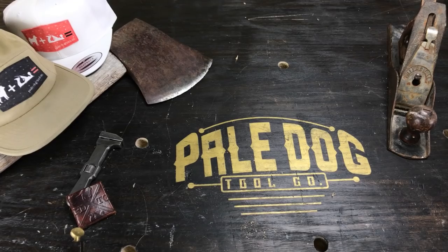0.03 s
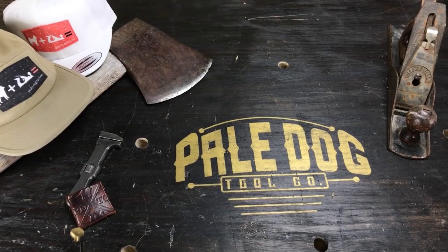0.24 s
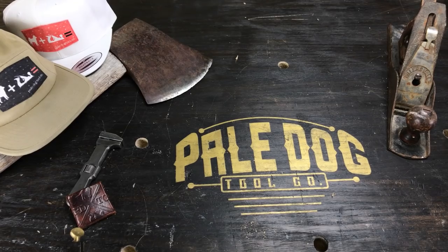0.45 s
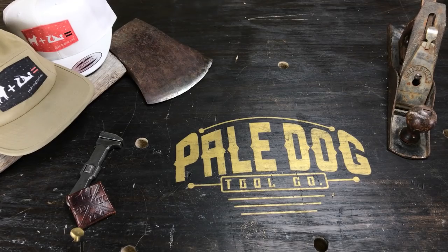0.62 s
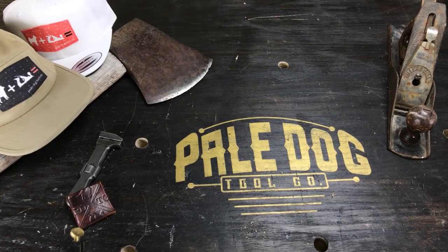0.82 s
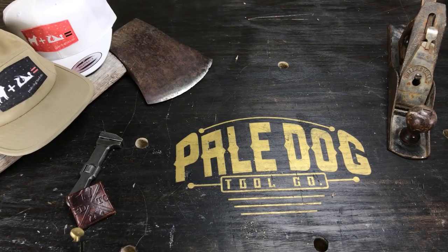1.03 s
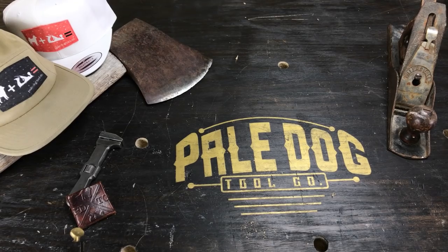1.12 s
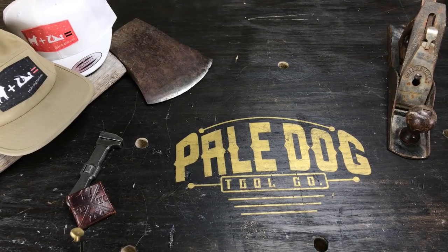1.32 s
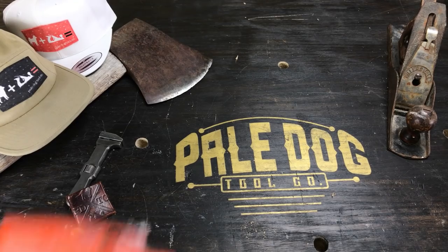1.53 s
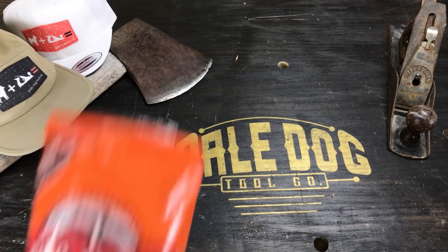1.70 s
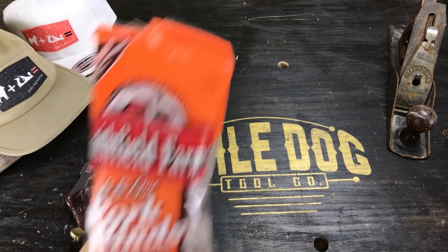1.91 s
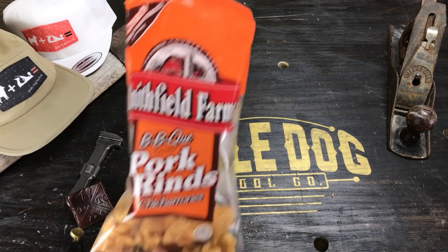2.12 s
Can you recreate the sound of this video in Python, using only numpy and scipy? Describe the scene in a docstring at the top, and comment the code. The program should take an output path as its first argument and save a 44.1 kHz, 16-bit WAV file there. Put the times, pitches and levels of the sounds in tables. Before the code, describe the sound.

A plastic snack bag crinkles close by, slightly left, in a small quiet room. Faint air and hum until 0.2 s, then dense bright crackles with brief hollow hoots and dull air thumps, strongest around 0.7-1.0 s. Snaps thin from 1.1 s and nearly stop by 1.55 s. From 1.85 s a much softer, darker rustle with low bumps sits further left, fading after 2.05 s.

```python
"""Plastic snack bag grabbed and turned

A plastic snack bag close by, a little to the left: each crease snaps as two resonant noise bursts, a bright
crack and a duller film ring, over dense crackle, rubbing noise and the lumpy noise boom of the air inside.
Noise fizz, narrow-band hoots and decaying sine thumps join in; a softer, darker rustle follows further left.
A small room answers with decaying noise; still air (noise) and a faint hum (sines) lie under all."""
import sys
import numpy as np
from scipy import signal
from scipy.fft import rfft, irfft, next_fast_len
from scipy.io import wavfile
from scipy.ndimage import map_coordinates

SR = 44100
rng = np.random.default_rng(int(sys.argv[2]) if len(sys.argv) > 2 else 0)


def dump(signal):
    """Clip the signal to [-1, 1] and save it as 16-bit WAV at the path in sys.argv[1]."""
    limited = np.clip(np.atleast_2d(signal).T, -1, 1)
    pcm = np.round(limited * 32767).astype(np.int16)
    wavfile.write(sys.argv[1], SR, pcm)


N = 94815

# handling of the bag, interpolated in time, before film colour:
# time_s, crackle_level_db, treble_over_level_db, boom_over_level_db, left_over_right_db
HANDLING = [(0.163, -77, 1, -8, -2), (0.169, -51.5, 1, -3, 3.5), (0.213, -56.5, 3.5, -5, 3),
            (0.224, -32, -9, -3, 4), (0.309, -29, 5, -16.5, 2), (0.328, -21.5, -1, -27, 2.5),
            (0.36, -31, 5, -11, 0.5), (0.41, -27.5, 3, -13.5, 1), (0.549, -32.5, 4.5, -15.5, 0),
            (0.56, -24.5, -5, -22, 1), (0.58, -28, 4, -6, 1), (0.6, -25.5, 3.5, -26, 1.5),
            (0.65, -24.5, -4.5, -8, -0.5), (0.68, -29.5, 6.5, -9, 4), (0.69, -28.5, 2, -15.5, 0.5),
            (0.81, -27, -0.5, -11.5, 0.5), (0.83, -34, 16, -8, 0), (0.84, -25.5, -2.5, -17, -2),
            (0.945, -29, -3, -12.5, -1), (1.05, -28, -1, -8.5, 0), (1.13, -35.5, 0, -17.5, -0.5),
            (1.21, -34, -3, -9, 2.5), (1.3, -36, -5, -16.5, 0), (1.36, -44, -5, -6.5, 5),
            (1.385, -35, -2, -12, -1), (1.43, -39.5, -3.5, -10.5, 2.5), (1.513, -38.5, -7.5, -17, 0),
            (1.521, -47.5, 5, -8, 1), (1.66, -55.5, 0.5, -1, 0), (1.84, -55, -12, -4.5, 4.0),
            (1.867, -40, -12, -4.5, 7), (1.94, -48, -3, 0, 3), (2.05, -48, -21, -5, 9),
            (2.065, -55, -9, -9, 5), (2.15, -54.5, -15, -6.5, 6)]
START_S = HANDLING[0][0]
LATE_S = 1.5  # start of the softer rustle


def amp(db):
    """dB to gain."""
    return 10 ** (np.asarray(db) / 20)


def unit(x):
    """Scale to rms 1."""
    return x / np.sqrt(np.mean(x ** 2) + 1e-20)


def along(points, hz):
    """Interpolate (Hz, value) points on a log frequency axis."""
    point_hz, value = np.transpose(points)
    return np.interp(np.log(hz + 1), np.log(point_hz + 1), value)


def sides(pan_db):
    """Left and right gains from left over right in dB."""
    return amp(np.array([pan_db, -pan_db]) / 2)


def filtered(x, response):
    """Multiply the spectrum of x by a response of frequency, zero-padded by at least half a second."""
    size = next_fast_len(N + SR // 2)
    spectrum = rfft(x, size) * response(np.fft.rfftfreq(size, 1 / SR))
    return irfft(spectrum, size)[..., :N]


def pair(x, gain, alike):
    """Mix two unrelated signals as mid and side into left and right of a given likeness per frequency."""
    def mid_side_gains(hz):
        angle = np.arccos(np.clip(along(alike, hz), -1, 1)) / 2
        return gain(hz) * np.array([np.cos(angle), np.sin(angle)])

    mid, side = filtered(x, mid_side_gains)
    return np.array([mid + side, mid - side])


def rush(spectrum):
    """Stereo Gaussian noise of rms 1 with a given spectrum."""
    # freq_hz, left_right_likeness
    likeness = [(25, .6), (60, 0.99), (300, 0.96), (1000, 0.82), (3000, 1), (8000, 0.64), (13000, 0.79)]
    noise = rng.standard_normal((2, N))
    return unit(pair(noise, lambda hz: amp(along(spectrum, hz)), likeness))


def gate(start_s, end_s):
    """Linear on and off ramps centred on the two times."""
    fade_s = 0.011
    t = np.arange(N) / SR
    return np.clip(np.minimum(t - start_s, end_s - t) / fade_s + 0.5, 0, 1)


def room_tone():
    """Still air as shaped noise, hum as steady sines."""
    air_level_db = -63.5
    # freq_hz, relative_db_per_hz
    air_spectrum = [(25, -39), (50, -18), (110, -3.5), (250, -13), (450, -11), (700, -15), (1300, -15),
                    (4000, -25.5), (15800, -30)]
    # freq_hz, rms_db
    hum_partials = [(239, -67.5), (360, -71.5)]
    t = np.arange(N) / SR
    hum = 0
    for hz, rms_db in hum_partials:
        hum = hum + amp(rms_db) * np.sqrt(2) * np.sin(2 * np.pi * (hz * t + rng.random()))
    return amp(air_level_db) * rush(air_spectrum) + hum


def hands(s):
    """Level, treble, boom and pan of the handling at times s."""
    time_s, *columns = np.transpose(HANDLING)
    return [np.interp(s, time_s, column) for column in columns]


def bursts(centre_hz, q, t60_s, broad_gain, size=768):
    """One tick and dying noise per row through its own resonance; rms 1 if packed into 1 ms."""
    tick_db = 14  # over the noise
    after_db, after_t60_s = -19, 0.035  # fainter, longer rattle
    broad_span = 5.1  # upper corner of the unpitched part over the pitch
    t = np.arange(size) / SR
    f = np.fft.rfftfreq(2 * size, 1 / SR)
    c = centre_hz[:, None]
    decay = amp(-60 * t / t60_s) + amp(after_db - 60 * t / after_t60_s)
    puff = rng.standard_normal((len(centre_hz), size)) * decay
    puff[:, :4] = np.sign(puff[:, :1]) * amp(tick_db) * [0, 0, 0, 1]
    damping = 1j * f * c / q
    resonance = damping / (c * c - f * f + damping)
    broad = 1j * f / (c + 1j * f) / (1 + 1j * f / (broad_span * c))
    b = irfft(rfft(puff, 2 * size) * (resonance + broad_gain * broad))[:, :size]
    return b * np.sqrt(SR / 1000) / np.linalg.norm(b, axis=1, keepdims=True)


def creases(start_s, crack_db, crack_hz, ring_db, ring_hz, pan_db):
    """Each crease gives a crack and a film ring, placed by level and a tiny lag between the sides."""
    crack_q, crack_t60_s, broad_db = 4, 0.004, -13
    ring_q, ring_t60_s = 3.24, 0.0099
    lag_spread_samples = 0.15  # left to right
    crack = amp(crack_db)[:, None] * bursts(crack_hz, crack_q, crack_t60_s, amp(broad_db))
    ring = amp(ring_db)[:, None] * bursts(ring_hz, ring_q, ring_t60_s, 0)
    snap = crack + ring
    size = snap.shape[1]
    lag_samples = lag_spread_samples * rng.standard_normal((len(start_s), 1))
    half_phase = lag_samples * np.fft.rfftfreq(size) * np.pi
    first = np.round(start_s * SR).astype(int)
    at = (first[:, None] + np.arange(size)).ravel()
    out = []
    for sign, gain in zip((1, -1), sides(pan_db)):
        shifted = irfft(rfft(snap) * np.exp(1j * sign * half_phase)) * gain[:, None]
        out.append(np.bincount(at, shifted.ravel(), N + SR)[:N])
    return np.array(out)


def crackle():
    """Many small creases at uniformly random moments, with levels and pan following the handling."""
    rate_per_s = 1100
    crack_offset_db, ring_offset_db = -3.5, -2.5
    crack_mid_hz, ring_mid_hz, pitch_log_spread = 4720, 1370, 0.54
    pan_spread_db = 3
    count = int(rate_per_s * N / SR)
    start_s = rng.uniform(START_S, N / SR, count)
    z = rng.standard_normal((count, 3))
    density_db = -10 * np.log10(rate_per_s / 1000)  # bursts are rms 1 at 1000 per s
    level_db, treble_db, _, pan_db = hands(start_s)
    pitch = np.exp(pitch_log_spread * np.clip(z, -2, 2))
    crack_db = level_db + treble_db + crack_offset_db + density_db
    ring_db = level_db + ring_offset_db + density_db
    return creases(start_s, crack_db, crack_mid_hz * pitch[:, 0],
                   ring_db, ring_mid_hz * pitch[:, 1], pan_db + pan_spread_db * z[:, 2])


def rub():
    """Smooth rubbing of the film: shaped noise following the handling, stronger in the later rustle."""
    offset_db, late_boost_db = -10.5, 6
    # freq_hz, relative_db_per_hz
    rub_spectrum = [(240, -58), (400, -4.5), (904, 5), (1010, -0.5), (1230, -2.5), (4480, -2.5),
                    (10600, -22.5), (15800, -48)]
    t = np.arange(N) / SR
    level_db, treble_db, _, pan_db = hands(t)
    gain_db = level_db + offset_db + treble_db / 2 + late_boost_db * (t > LATE_S)
    return (t > START_S) * amp(gain_db) * sides(pan_db) * rush(rub_spectrum)


def boom():
    """Air inside the bag: low noise in random lumps, following the handling."""
    offset_db, lump_spread_db, lumps_per_s = -1.5, 3, 50
    # freq_hz, relative_db_per_hz
    boom_spectrum = [(24, -65), (40, -66), (113, -11.5), (235, 0.5), (340, 5.5), (478, -4.5), (600, -9),
                     (780, -39), (1320, -120)]
    t = np.arange(N) / SR
    level_db, _, boom_db, _ = hands(t)
    knots = rng.standard_normal(int(N * lumps_per_s / SR) + 4)
    lumps_db = lump_spread_db * map_coordinates(knots, [t * lumps_per_s])
    lumpy = unit(amp(lumps_db) * rush(boom_spectrum))
    return (t > START_S) * amp(level_db + offset_db + boom_db) * lumpy


def fizz():
    """High smooth fizz of the film sliding: gated stereo noise."""
    # start_s, end_s, rms_db
    slides = [(0.167, 0.22, -56.5), (0.222, 0.28, -38), (1.52, 1.675, -62)]
    # freq_hz, relative_db
    fizz_spectrum = [(7000, -28), (10500, 6), (14500, -4), (16000, -13)]
    envelope = sum(amp(db) * gate(start_s, end_s) for start_s, end_s, db in slides)
    return envelope * rush(fizz_spectrum)


def snaps():
    """Loud single crease snaps, each a crack and a film ring."""
    # before film colour, levels as rms in 1 ms:
    # start_s, crack_db, crack_hz, ring_db, ring_hz, left_over_right_db
    loud_creases = [(0.1688, -61, 2540, -45.5, 1220, 6), (0.2241, -36, 2560, -41, 2240, 2),
                    (0.273, -30, 2540, -22.5, 950, 4), (0.2794, -20.5, 7100, -48, 700, 4),
                    (0.3278, -20, 10440, -17, 1630, 3), (0.3347, -19.5, 4570, -19, 1090, 2),
                    (0.3502, -26, 6750, -22, 2410, 4), (0.3725, -15.5, 7300, -23, 2220, 3.1),
                    (0.3993, -24, 11500, -26, 1490, 2), (0.4081, -15.5, 5900, -22, 1290, 4),
                    (0.4141, -20, 3080, -18.5, 1410, 5), (0.4286, -25, 7460, -23, 1340, 5),
                    (0.4365, -14, 7100, -39, 1550, 6), (0.4445, -14.5, 8000, -25, 910, -2),
                    (0.4735, -21, 6500, -26, 1400, -8), (0.4857, -17, 7800, -30, 1430, 7.5),
                    (0.4993, -29, 3250, -30, 1210, 13), (0.53, -38, 3570, -24.5, 1760, 5),
                    (0.5575, -45, 2580, -18.5, 1850, 5), (0.5692, -21.5, 3190, -25.5, 870, 13),
                    (0.5776, -18, 4690, -19, 1450, 3), (0.5982, -19, 6640, -28, 1120, -2),
                    (0.6148, -30, 4100, -15, 1940, 0), (0.6305, -16, 7140, -22, 1520, -1),
                    (0.6723, -15, 4500, -21.5, 1080, 4), (0.6781, -21.5, 5800, -21, 1120, -1),
                    (0.6848, -11.5, 7000, -24, 2120, -1.5), (0.7328, -24, 4800, -22, 2190, -2),
                    (0.743, -40, 3380, -17.5, 1370, 3), (0.7516, -15, 5200, -22, 1360, 0),
                    (0.7669, -24, 5529, -23.5, 1160, 5), (0.772, -30, 3400, -21, 1100, -2),
                    (0.7832, -20, 4940, -36, 860, -2), (0.8024, -23, 4800, -22, 1500, 6),
                    (0.815, -19, 2860, -20, 1190, 9), (0.8255, -9.5, 4750, -11.5, 2030, 0),
                    (0.8312, -18.5, 5400, -15.5, 1360, -2), (0.864, -18, 5000, -48, 2150, 2.3),
                    (0.868, -12.5, 4430, -24, 1910, -2), (0.8731, -12.5, 6000, -18, 2390, 5),
                    (0.8877, -26, 5940, -18.5, 1770, -4), (0.8954, -17, 3040, -18, 2020, 3),
                    (0.9013, -19, 2500, -46, 2070, -9), (0.9096, -12.5, 5730, -15.5, 960, 2.5),
                    (0.9185, -17, 3220, -23.5, 1460, -1), (0.9517, -13.5, 5860, -40, 2200, 2.5),
                    (0.9835, -17.5, 3497, -35, 1080, 0), (0.996, -11.5, 5800, -24, 1650, 1),
                    (1.007, -22.5, 6600, -23, 1950, 6), (1.027, -16.5, 2860, -17.5, 990, 1),
                    (1.0332, -22.5, 5970, -22, 1480, -1), (1.0503, -23.5, 3300, -24, 1550, 5),
                    (1.0764, -20.5, 4610, -22.5, 1140, 6), (1.0829, -20.5, 10700, -27, 1960, 3),
                    (1.1136, -26, 4940, -35, 1850, 8), (1.119, -30, 6030, -24.5, 1500, 2),
                    (1.1247, -32, 2520, -29, 2190, -1), (1.1685, -21.5, 2550, -23.5, 2500, 5),
                    (1.1738, -34, 3320, -24.5, 684, 2.5), (1.181, -31, 7960, -42, 1520, 2),
                    (1.2106, -29, 5076, -47, 1850, -3), (1.2229, -31.5, 6760, -27, 1470, 3),
                    (1.255, -51, 5680, -39, 1940, -6), (1.2742, -25, 4070, -27.5, 780, 3),
                    (1.2763, -28, 3880, -28.5, 1760, 7), (1.2976, -34, 2540, -31, 1450, 6),
                    (1.332, -33, 5770, -34, 1290, 0), (1.3635, -33, 4570, -40, 1550, 2.1),
                    (1.3768, -23, 3072, -24.5, 910, 2.5), (1.3823, -21.5, 5000, -24, 2160, 2.5),
                    (1.4014, -33.5, 3200, -26.5, 975, 4), (1.408, -40, 3200, -28, 940, 1),
                    (1.4729, -38, 3320, -40, 2020, -2), (1.4775, -37, 3880, -51, 1770, 2),
                    (1.5157, -41, 4380, -38, 920, 1), (1.8574, -69, 3540, -44, 1380, 8),
                    (1.863, -65, 2540, -53, 2020, 6.2), (1.8682, -66, 3570, -49, 1590, 10),
                    (1.8728, -63, 2540, -41.5, 2110, 12), (1.9005, -60, 2540, -35.5, 1900, 12),
                    (1.9052, -32, 3530, -32, 1340, 4.9), (1.9243, -60, 2540, -38, 2110, 10),
                    (1.938, -54, 2540, -35, 1810, 9), (1.9544, -66, 2540, -38, 2100, 11),
                    (1.9649, -61, 2540, -35.5, 1500, 14), (1.9842, -33, 2450, -44, 505, 7),
                    (1.991, -66, 2540, -41.5, 1550, 12), (2.02, -65, 2543, -38.5, 1260, 10),
                    (2.0297, -35, 2540, -39.5, 520, 3), (2.0385, -61, 2540, -42, 2450, 0),
                    (2.0447, -58, 2540, -38.5, 1930, 14), (2.1128, -44, 3300, -50, 1780, 6),
                    (2.1448, -49, 3660, -45, 2560, -10)]
    return creases(*np.transpose(loud_creases))


def hoots():
    """Hoots of the bag's hollow: gated very narrow noise, the same on both sides."""
    centre_hz, half_width_hz = 845, 18  # half width to 1/e
    # start_s, length_s, rms_db
    hoot_events = [(0.223, 0.023, -34.5), (0.318, 0.022, -31), (0.445, 0.028, -36)]
    noise = rng.standard_normal(N)
    narrow = unit(filtered(noise, lambda f: np.exp(-((f - centre_hz) / half_width_hz) ** 2)))
    return narrow * sum(amp(db) * gate(s, s + length_s) for s, length_s, db in hoot_events)


def thumps():
    """Dull thumps of the air-filled bag: decaying low sines, the same on both sides."""
    cycles_to_60_db, rise_s, low_cut_hz = 10, 0.002, 110
    # start_s, level_db (before rise, decay and low cut), pitch_hz
    thump_events = [(0.329, -25, 463), (0.411, -22, 385), (0.634, -24, 260), (0.732, -19.5, 367),
                    (0.799, -26.5, 273), (0.803, -28.5, 134), (0.864, -19, 336), (1.054, -32, 154),
                    (1.163, -49, 482), (1.522, -34.5, 233), (1.865, -43, 310), (1.884, -36, 376),
                    (1.917, -44, 320), (1.965, -32, 307), (1.983, -26.5, 287), (2.025, -34, 328),
                    (2.044, -33, 284)]
    out = np.zeros(N + SR)
    t = np.arange(SR // 10) / SR
    rise = 1 - np.exp(-t / rise_s)
    for start_s, level_db, hz in thump_events:
        envelope = amp(level_db - 60 * t * hz / cycles_to_60_db) * rise
        out[round(start_s * SR):][:len(t)] += envelope * np.sin(2 * np.pi * hz * t)
    return filtered(out[:N], lambda f: (1j * f / (low_cut_hz + 1j * f)) ** 2)


def room(x):
    """Room answer: convolution with noise whose frequencies each die at their own speed."""
    delay_s = 0.003
    # freq_hz, t60_s
    decay_times = [(200, 0.28), (1500, 0.33), (6000, 0.35), (14000, 0.064)]
    # freq_hz, left_right_likeness
    tail_likeness = [(100, 0.53), (400, 0.79), (1500, 0.033), (5000, 0.18), (13000, 0.23)]
    hz, t, z = signal.stft(rng.standard_normal((2, SR // 2)), SR, nperseg=256)
    decay = amp(-60 * t / along(decay_times, hz)[:, None])
    tail = signal.istft(z * decay, SR, nperseg=256)[1]
    tail = tail / np.linalg.norm(tail[0])
    delayed = np.pad(x.mean(0), (int(delay_s * SR), 0))[None]
    answer = signal.fftconvolve(delayed, tail, axes=1)[:, :N]
    return pair(answer, np.ones_like, tail_likeness)


def scene():
    """Coloured creases, rub and boom, then fizz, hoots and thumps, in the room over the room tone."""
    room_level_db = -9.5
    # radiation of the film: freq_hz, gain_db
    film_colour = [(35, -7), (90, -2), (300, -1), (700, 0.5), (2000, 0.5), (5000, 0), (9000, -1),
                   (13000, -1.5), (16000, -10.5)]
    # extra colour of the later rustle: freq_hz, gain_db
    late_colour = [(400, -0.5), (800, -5), (1300, -2.5), (1650, -2.5), (2200, -1), (2800, -6), (3500, -2),
                   (6000, -4), (12000, -4.5)]
    film = snaps() + crackle() + rub() + boom()
    early = filtered(film, lambda hz: amp(along(film_colour, hz)))
    late = filtered(early, lambda hz: amp(along(late_colour, hz)))
    bag = np.where(np.arange(N) < LATE_S * SR, early, late)
    bag = bag + fizz() + hoots() + thumps()
    return bag + amp(room_level_db) * room(bag) + room_tone()


def record(dry):
    """Two ports differing in colour, with nothing kept from the band limit up."""
    top_hz = 15900
    # freq_hz, left_over_right_db
    port_colour = [(250, 1), (700, 1), (2500, -0.05), (8000, 1), (13000, -0.8)]
    return filtered(dry, lambda hz: sides(along(port_colour, hz)) * (hz < top_hz))


dry = scene()
out = record(dry)
dump(out)
```